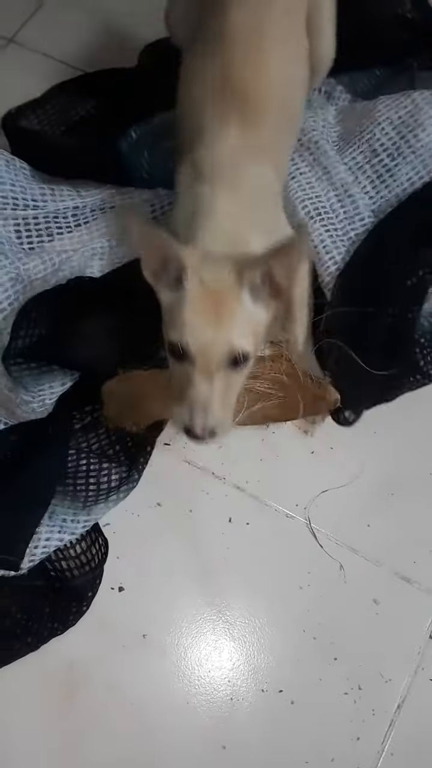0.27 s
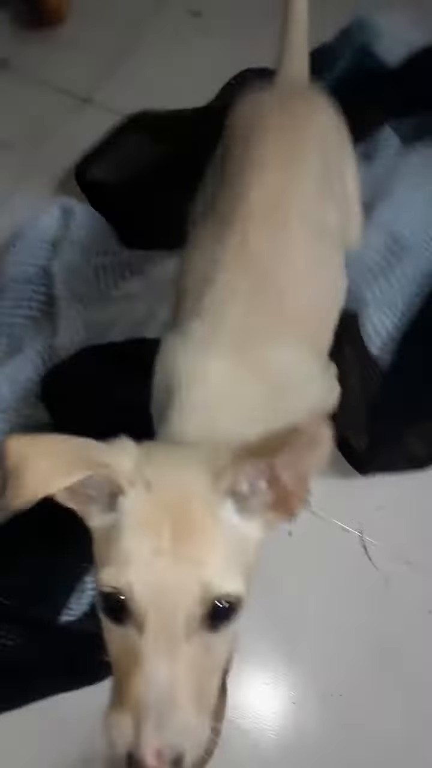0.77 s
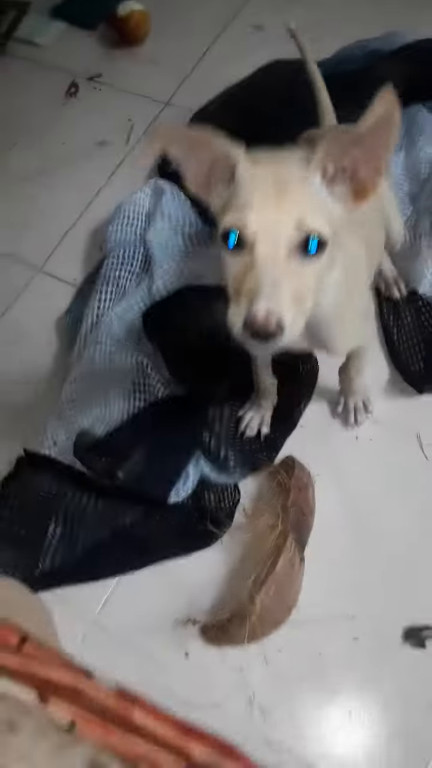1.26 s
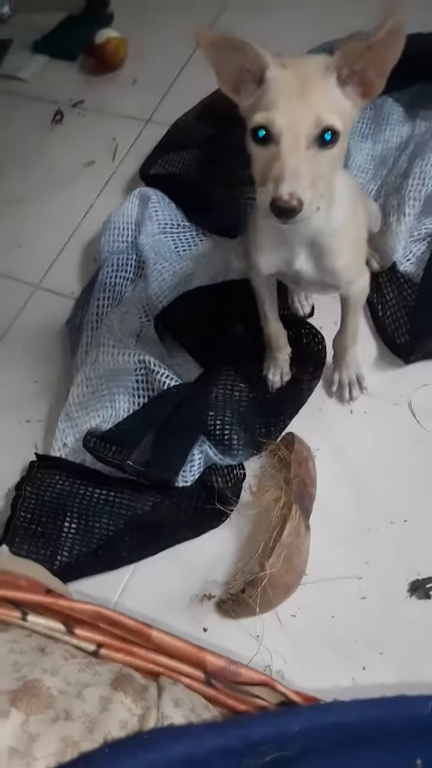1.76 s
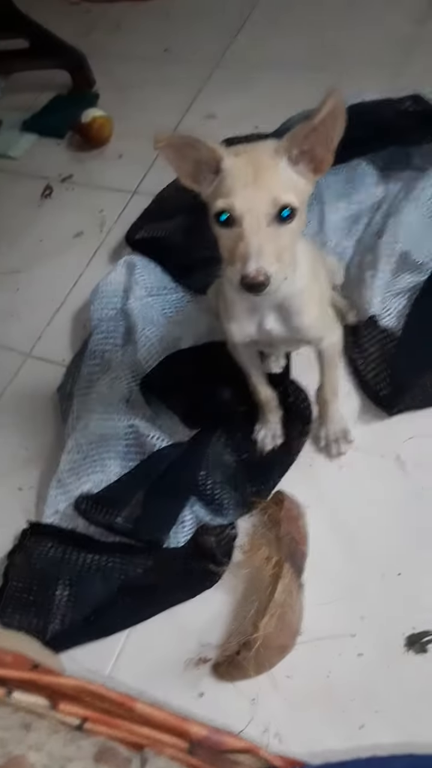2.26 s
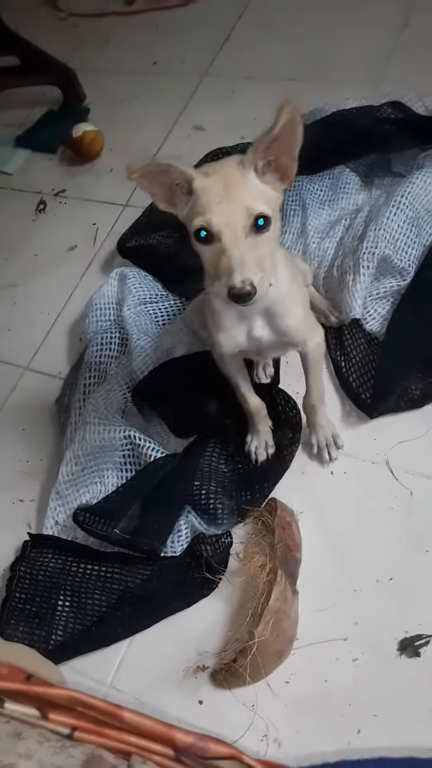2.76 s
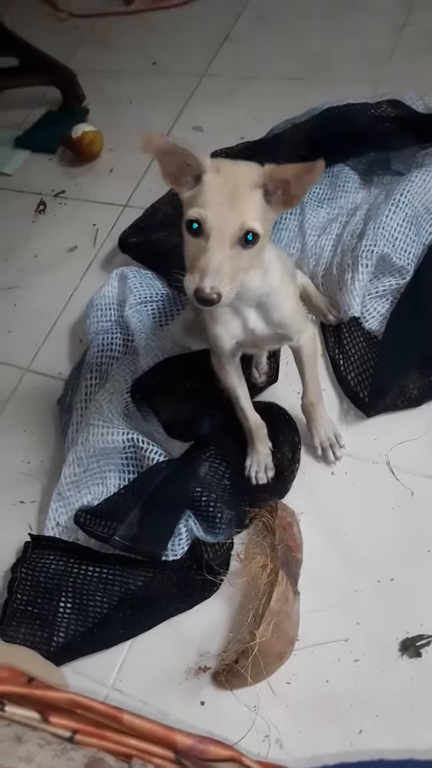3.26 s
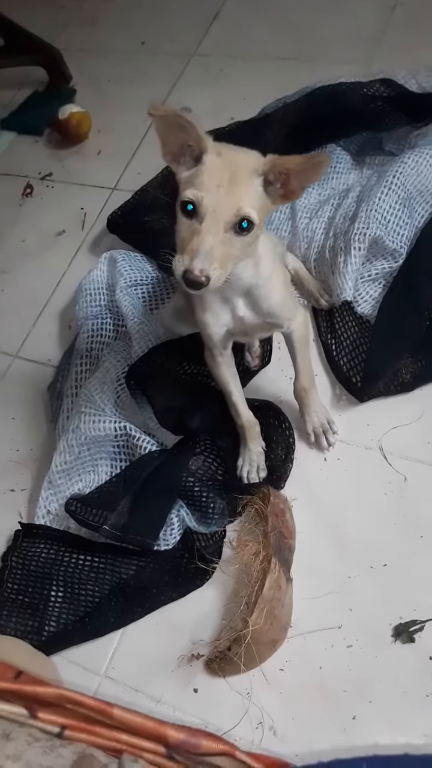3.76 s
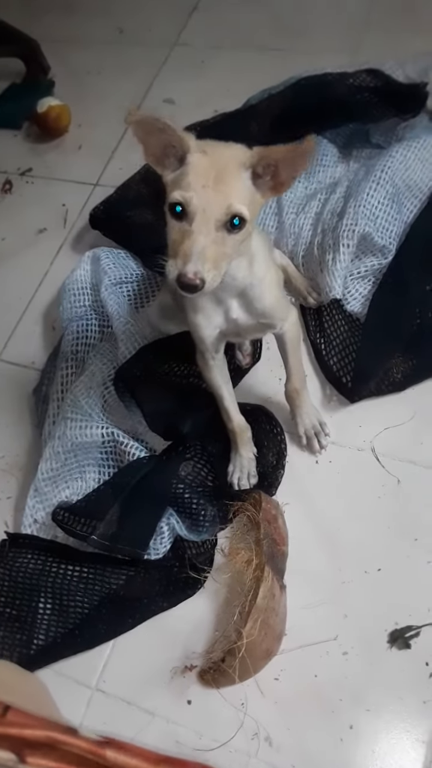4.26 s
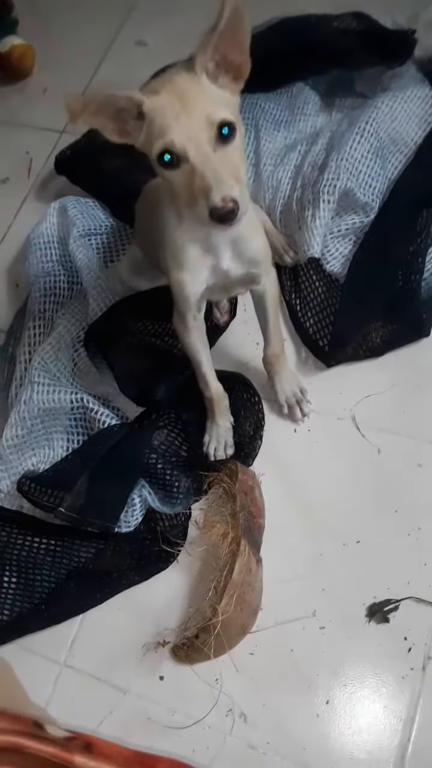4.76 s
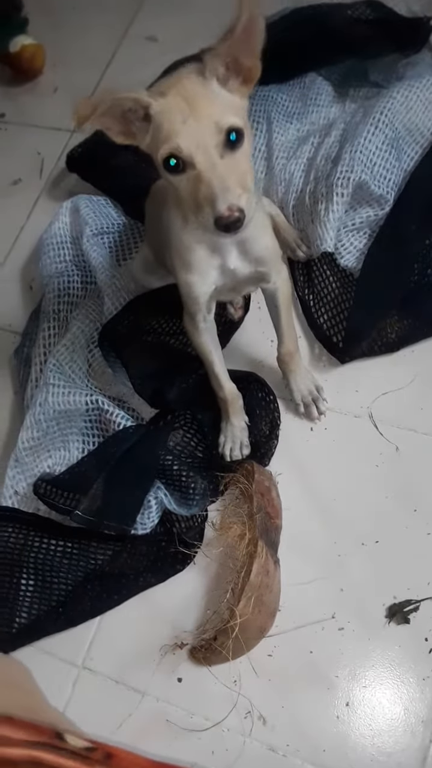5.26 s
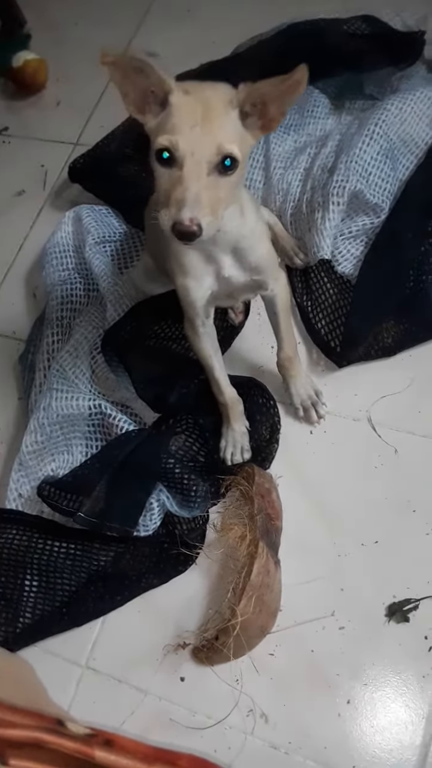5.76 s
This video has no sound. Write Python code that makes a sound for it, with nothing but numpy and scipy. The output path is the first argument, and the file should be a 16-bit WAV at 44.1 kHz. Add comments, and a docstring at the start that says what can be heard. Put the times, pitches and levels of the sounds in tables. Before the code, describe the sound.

A dry husk knocks on tiles and netting rustles as a puppy squeaks rapidly, its high voice then stretching into four piercing whines.

```python
"""Traffic hums outside throughout, with the end of a far horn blast at first and a second blast from 2.4 s.
In the first second a puppy drops a dry husk on tiles, its claws knock and netting rustles under its paws.
From 0.1 s it begs in short creaky squeaks: its vocal folds snap shut in sharp pulses that ring in a small muzzle.
Between squeaks it draws air, heard as coloured noise and a thin nose whistle.
At 2.9 s its voice breaks into four long, loud whines, made by the same folds in a more open muzzle."""
import sys
import numpy as np
from scipy import signal
from scipy.fft import rfft, irfft
from scipy.io import wavfile
from scipy.ndimage import uniform_filter1d

SR = 44100
rng = np.random.default_rng(int(sys.argv[2]) if len(sys.argv) > 2 else 0)


def master_out(mix):
    """Clip the mix to full scale and print it as 16-bit PCM to the path in sys.argv[1]."""
    frames = np.transpose(np.atleast_2d(mix))
    ceiling = np.clip(frames, -1, 1)
    pcm = np.round(ceiling * 32767).astype(np.int16)
    wavfile.write(sys.argv[1], SR, pcm)


N = 265041

# Levels in the tables are relative: the functions below add their own trims in dB. traffic over time: time_s,
# engines_db, tyre_drone_db
TRAFFIC = [(0.0, -53.5, -59.5), (0.28, -53.5, -60.5), (0.52, -51, -58.5), (0.75, -53, -52.5),
           (0.97, -54.5, -59.5), (1.24, -52, -66), (1.57, -56.5, -63), (1.89, -57, -51), (2.02, -60, -55),
           (2.43, -62, -68.5), (2.58, -64, -71.5), (2.89, -64, -64.5), (3.28, -65, -76), (3.65, -64, -66),
           (3.87, -64, -75), (4.37, -66.5, -72.5), (4.84, -64.5, -64.5), (5.04, -64.5, -71.5),
           (5.29, -64.5, -66), (5.46, -67.5, -68.5), (5.71, -61, -72), (6.01, -65, -65.5)]
# colour of the engines: frequency_hz, density_db (per Hz)
ENGINE_COLOUR = [(65, -17), (110, 3.5), (124, 3.5), (188, -3.5), (226, 2.5), (297, -5), (320, -2),
                 (420, -32), (700, -120)]
# colour of the steady deep rumble: frequency_hz, density_db (per Hz)
RUMBLE_COLOUR = [(15, -43.5), (25, -39.5), (32, -24), (34, -24), (40, -19.5), (54, -0.5), (81, 4),
                 (130, -21.5), (170, -31.5), (290, -120)]
# colour of the still air: frequency_hz, density_db (per Hz)
AIR_COLOUR = [(240, -36.5), (400, -12.5), (598, -53), (765, -18), (1580, -15.5), (1930, -21.5),
              (3120, -25.5), (3530, -8), (3870, -32), (7060, -21), (8630, -55.5), (16000, -29)]
RUMBLE_DB, AIR_DB = -61, -63
# one engine draws away: time_s, hum_hz (before a small random wobble), level_db
ENGINE_HUM = [(0, 165.2, -50.5), (.2, 142, -52.5), (.55, 139, -55.5), (.8, 123.7, -58.5), (1.3, 115.7, -65),
              (2.0, 119.5, -67.5), (3.0, 112.1, -70), (6.01, 118.4, -69)]
# far horn: start_s, end_s, note_db, overtones_db
HORN_BLASTS = [(-.1, .17, -54, -85), (2.42, 3.95, -69, -58)]
HORN_HZ, HORN_FADE_S = 638, 0.17

# netting under the paws, as the puppy steps forward and sits down: time_s, level_db
NETTING_LEVEL = [(0, -50.5), (.1, -54), (.45, -62), (.62, -38.5), (.65, -48.5), (.7, -39.5), (.97, -56),
                 (4.0, -77), (6.01, -75.5)]
# colour of the netting, also used for the hiss of breath: frequency_hz, density_db (per Hz)
RUSTLE_COLOUR = [(650, -43), (1100, -12.5), (1490, -14.5), (2130, -18), (4170, -12), (5400, -10.5),
                 (6390, -8.5), (8260, -27.5), (14300, -10.5), (16000, -16)]
# husk and claws touching the tiles: touch_s, knock_db, snap_db
KNOCKS = [(0.18, -38, -22), (0.183, -35, -15), (0.407, -54, -32), (0.488, -32, -39), (0.591, -24.5, -17),
          (0.61, -47.5, -23), (0.655, -47, -26), (0.684, -43, -22), (0.696, -12, -17), (0.751, -28.5, -27)]
# colour of the dull knock: frequency_hz, density_db (per Hz)
HUSK_COLOUR = [(88, -69.5), (150, -22), (1090, -6.5), (1300, -7), (1570, -5), (2600, -6), (2970, -15.5),
               (3600, -9), (4540, -14), (5200, -11.5), (8100, -29.5), (15000, -19)]
ROOM_T60_S = 0.32   # time for the reflections to fall by 60 dB

# breaths drawn between calls: start_s, length_s, muzzle_db, hiss_db, whistle_hz (before a small wobble), whistle_db
PANTS = [ (0.285, 0.22, -58.5, -54.5, 3450, -59), (0.942, 0.19, -46.5, -61, 3482, -66),
         (1.189, .19, -86, -47.5, 3496, -76), (1.531, 0.3, -57.5, -57, 3703, -64),
         (1.827, 0.19, -49.5, -65, 3600, -56.5), (2.164, 0.16, -95, -61, 3730, -58),
         (2.578, 0.28, -66, -65, 3660, -57.5), (3.66, 0.2, -89, -76, 3563, -57),
         (5.389, .4, -100, -76, 3535, -70.5), ]
PANT_FADE_S = 0.0083

# resonances of the nose: frequency_hz, width_hz, gain_db
NOSE = [(11110, 320, 12.5), (10860, 120, 6.5), (11700, 110, 15), (15200, 870, -8.5), (14500, 4800, 14.5)]
# resonance of the mouth: frequency_hz, width_hz, gain_db
MOUTH = [(2648, 250, 0)]
# resonances of the muzzle in whines: frequency_hz, width_hz, gain_db
MUZZLE_OPEN = [(1432, 930, -11.5), (4003, 635, -1.5), (4520, 1020, -3.5), (6060, 1020, 1), (6910, 263, 7),
               (7080, 660, -1.5)]
# resonances of the muzzle in squeaks: frequency_hz, width_hz, gain_db
MUZZLE_SHUT = [(1582, 690, 2.5), (3760, 700, 3.5), (4770, 680, 2.5), (5600, 590, 3.5), (6340, 277, 10),
               (7100, 540, 4)]

# short squeaks, most of them an arch of pitch, one almost level with a slight dip:
# start_s, rise_s, fall_s, first_hz, crest_hz (the turning point), last_hz, level_db,
# fundamental_db and treble_db (relative to the level), period_doubling (0-1), flutter (share of the pitch)
SQUEAKS = [ (0.112, 0.074, 0.075, 1410, 1925, 1149, -36, -9, 0, .4, .026),
           (0.237, 0.015, 0.055, 1581, 1660, 1200, -35, -3, 0.5, .3, 0.022),
           (0.43, 0.091, 0.093, 1400, 1830, 1400, -39, -6.5, 0, 0.4, 0.0035),
           (0.757, 0.06, 0.14, 1320, 1712, 1120, -40, 3, -0.5, 0.55, 0.0055),
           (1.055, 0.089, 0.063, 1189, 1679, 1080, -35.5, -3.5, -1, .38, 0.0099),
           (1.359, 0.077, 0.11, 1404, 1945, 1270, -38.5, -8.5, 0.5, 0.14, .007),
           (1.678, 0.07, 0.087, 1480, 1586, 1220, -36.5, -6.5, -1.5, 0.92, 0.0053),
           (1.982, 0.069, 0.12, 1360, 1852, 1320, -39.5, -7, 0.5, .15, 0.0066),
           (2.32, 0.04, 0.2, 1912, 1925, 1390, -38, -6.5, 2.5, 0.18, 0.0242),
           (2.498, 0.056, 0.05, 1494, 1710, 1530, -41.5, -9, 0, 0.55, 0.017),
           (2.782, 0.028, 0.055, 1632, 1600, 1700, -38, -10, -7, .2, .01),
           (2.815, 0.073, 0.052, 1663, 2143, 1255, -32.5, -8.5, 1.5, 0, 0.022), ]
SQUEAK_ATTACK_S, SQUEAK_RELEASE_S = 0.04, 0.041
ARCH_BEND = 1.1   # 1 = pointed turning point, 2 = round
# a squeak starts and ends as a creak, its pure tone this much weaker
LOCK_S, UNLOCK_S, CREAK_DROP_DB = 0.045, 0.016, 16
SQUEAK_QUAVER_DB, QUAVER_HZ = 1.0, 30   # the push behind a squeak is unsteady

# the four long whines, one table each: time_s, pitch_hz, effort_db, treble_db (relative to the effort)
FIRST_WHINE = [(2.92, 1410, -34, 9), (2.928, 1314, -33, 4.5), (2.956, 1358, -33.5, 8),
               (2.994, 1218, -26, -1.5), (3.01, 1303, -31.5, 2.5), (3.136, 1345, -31.5, 1),
               (3.17, 1283, -29.5, 2), (3.216, 1074, -25, 0.5), (3.294, 1089, -26, -2),
               (3.392, 955, -28.5, 0), (3.458, 985, -27.5, -2), (3.472, 907.3, -30, -0.5),
               (3.534, 885, -29.5, -2.5), (3.588, 699, -36, -0.5), (3.62, 730, -40, -3),
               (3.658, 897, -43.5, 3), (3.698, 736, -59, -1), (3.72, 697.6, -56.5, -14)]
SECOND_WHINE = [(4.025, 568, -69.5, -5), (4.061, 596, -44, -3.5), (4.109, 625, -39, 10),
                (4.131, 595, -35, 5.5), (4.161, 588, -30.5, 0), (4.193, 774.2, -31.5, 0.5),
                (4.257, 792, -30, -0.5), (4.371, 972.0, -30, 1.5), (4.399, 920, -32.5, 5),
                (4.549, 1023, -28, 1), (4.607, 906.8, -25, 2), (4.669, 523.5, -50.5, 11.5),
                (4.72, 492, -60, 4)]
THIRD_WHINE = [(4.73, 483, -55, 1), (4.77, 556, -53, 9.5), (4.8, 478.4, -46.5, 9), (4.824, 569, -37.5, 6),
               (4.878, 506.5, -35, 6), (4.89, 683, -31, 3.5), (4.922, 691, -28.5, 2.5),
               (4.948, 649, -30, 2), (4.986, 725, -27, 0), (5.024, 712.9, -29.5, 4), (5.056, 839, -28, -2),
               (5.1, 827, -30, 5), (5.146, 969, -26.5, -0.5), (5.248, 804.5, -28, 4), (5.278, 676, -27, 2),
               (5.302, 506, -31.5, 6), (5.348, 387.6, -33.5, 5), (5.4, 382, -63.5, 4)]
LAST_WHINE = [(5.795, 660.0, -63, 6), (5.803, 662.5, -37.5, 6), (5.847, 1088, -24, -7),
              (5.871, 1220, -27.5, -1), (5.915, 1118, -25.5, -4.5), (5.963, 1105, -24.5, 0),
              (5.973, 1171, -27, 3), (6.01, 1099, -26.5, 3)]
# how each whine is held: start_roughness (0-1), end_roughness (0-1), start_mouth_db, end_mouth_db, fundamental_db
WHINE_MANNER = [(.06, 0.8, -1.5, 4.5, 0), (0.81, 0.52, -6, -6, 2), (0.12, 0.5, 1.5, -11, 0.5),
                (.15, 0.3, -1, 2, -1.5)]
# the voice breaks from squeak to whine: start_s, end_s, added_flutter (share of the pitch), added_doubling (0-1)
VOICE_BREAK = (2.91, 3.005, .033, .18)
FULL_VOICE_DB, ROUGHER_PER_DB = -34, 0.022   # below this effort the folds grow unsteady
# flutter as a share of the pitch, up to doubled by roughness; period doubling (0-1)
WHINE_FLUTTER, WHINE_DOUBLING = 0.0041, 0.0083
# high notes have more fundamental and ring more in the mouth
PURE_HZ, PURER_DB_PER_OCTAVE, MOUTH_DB_PER_OCTAVE = 1308, 23.5, 19


def from_db(db):
    """Turn decibels into a plain gain."""
    return 10 ** (np.asarray(db) / 20)


def rms_one(x):
    """Scale a sound to an average level of 1."""
    return x / np.sqrt(np.mean(x ** 2) + 1e-20)


def in_time(rows):
    """Draw straight lines between the rows of a table: one curve per column, sample by sample."""
    rows = np.array(rows)
    times, *columns = rows[np.argsort(rows[:, 0], kind="stable")].T
    return [np.interp(np.arange(N) / SR, times, column) for column in columns]


def held(rows):
    """Hold each column of an event table from the start of one event to the next."""
    rows = np.array(rows)
    event = np.searchsorted(np.sort(rows[:, 0]), np.arange(N) / SR) - 1
    return rows[np.maximum(event, 0)].T


def swell(start, end, attack_s, release_s):
    """Attack, hold and release, from 0 to 1 and back."""
    t = np.arange(N) / SR
    return np.clip(np.minimum((t - start) / attack_s, (end - t) / release_s), 0, 1)


def drift(rate_hz):
    """Smoothly wandering chance with spread 1; a higher rate wanders faster."""
    r = np.exp(-2 * np.pi * rate_hz / SR)
    wander = signal.lfilter([1], [1, -2 * r, r * r], rng.standard_normal(N + SR))
    return rms_one(wander[SR:])


def cut(x, hz, kind, order=2):
    """Remove the highs, the lows or both with a smooth filter."""
    return signal.sosfilt(signal.butter(order, hz, kind, fs=SR, output="sos"), x)


def resonate(x, modes):
    """Ring several resonances side by side, with alternating signs."""
    out = 0
    for k, (hz, width, db) in enumerate(modes):
        r = np.exp(-np.pi * width / SR)
        gain = (-1) ** k * from_db(db) * (1 - r * r) / 2
        feedback = [1, -2 * r * np.cos(2 * np.pi * hz / SR), r * r]
        out = out + signal.lfilter([gain, 0, -gain], feedback, x + 1e-18)
    return out


def colour(x, spectrum, size=8192):
    """Filter with the given spectrum and unit energy, its response as early as possible (minimum phase)."""
    hz, db = np.transpose(spectrum)
    octaves = np.log2(np.maximum(np.arange(size // 2 + 1) * SR / size, 1))
    beyond = np.abs(octaves - np.clip(octaves, np.log2(hz[0]), np.log2(hz[-1])))
    # outside the table the spectrum falls by 20 dB per octave
    full_db = np.interp(octaves, np.log2(hz), db) - 20 * beyond
    cepstrum = irfft(np.log(from_db(full_db)))
    kernel = irfft(np.exp(rfft(2 * cepstrum[:size // 2], size)))
    return signal.fftconvolve(x, kernel / np.linalg.norm(kernel))[:N]


def noise(spectrum):
    """Steady noise with the given colour."""
    return rms_one(colour(rng.standard_normal(N), spectrum))


def noise_band(hz, width_hz):
    """Noise sent twice through one resonance."""
    mode = [(hz, width_hz, 0)]
    return rms_one(resonate(resonate(rng.standard_normal(N), mode), mode))


def even(x, size=700):
    """Hold the running level at 1."""
    power = uniform_filter1d(uniform_filter1d(x * x, size), size)
    return x / np.sqrt(np.abs(power) + 1e-12)


def horn():
    """Far blasts of one note and two overtones, blurred by the street into narrow noise bands."""
    gate = sum(swell(start, end, HORN_FADE_S, HORN_FADE_S) for start, end, *_ in HORN_BLASTS)
    _, _, note_db, overtones_db = held(HORN_BLASTS)
    note = noise_band(HORN_HZ, 81)
    overtones = noise_band(2 * HORN_HZ, 76) + from_db(-4.5) * noise_band(3 * HORN_HZ, 83)
    return gate * (from_db(note_db) * note + from_db(overtones_db) * overtones)


def surroundings(drone_hz=360, drone_width_hz=220, air_db=-5.0, rumble_db=-1.0):
    """Noise for traffic, tyre drone, rumble and still air; a wavering sine for one engine; the far horn."""
    engines_db, drone_db = in_time(TRAFFIC)
    engines = from_db(engines_db) * noise(ENGINE_COLOUR)
    drone = from_db(drone_db) * noise_band(drone_hz, drone_width_hz)
    hum_hz, hum_db = in_time(ENGINE_HUM)
    hum_phase = 2 * np.pi * np.cumsum(hum_hz * (1 + 0.02 * drift(11))) / SR
    hum = from_db(hum_db + 2 * drift(22)) * np.sqrt(2) * np.sin(hum_phase)
    rumble = from_db(RUMBLE_DB + rumble_db) * noise(RUMBLE_COLOUR)
    air = from_db(AIR_DB + air_db) * noise(AIR_COLOUR)
    return engines + drone + hum + horn() + rumble + air


def netting(grain_db=2.0):
    """The mesh rustles under the paws as grainy noise and settles as the puppy sits."""
    level_db, = in_time(NETTING_LEVEL)
    return from_db(level_db) * rms_one(noise(RUSTLE_COLOUR) * from_db(grain_db * drift(150)))


def knocks(body_db=20.0, snap_db=16.5, scrape_db=-18.0, scrape_s=0.019):
    """Each contact is a dull knock and a bright snap, followed by a short scrape of fibres."""
    touch_s, knock_db, bright_db = np.transpose(KNOCKS)
    knock, snap = np.zeros((2, N))
    at = ((touch_s + 0.0025) * SR).astype(int)   # the force peaks just after first touch
    knock[at] = from_db(knock_db + body_db)
    snap[at] = from_db(bright_db + snap_db)
    t = np.arange(SR // 4) / SR
    crackle = rng.random(len(t)) < 1800 / SR   # about 1800 tiny snaps a second
    fibres = rms_one(rng.standard_normal(len(t)) * crackle)
    contact = from_db(scrape_db - 13.5) * fibres * np.exp(-t / scrape_s)
    contact[0] = 1   # the hit itself
    hits = cut(colour(knock, HUSK_COLOUR), 14000, "low") + cut(snap, [3300, 7500], "band")
    return signal.fftconvolve(hits, contact)[:N]


def pants(hz=1520, width_hz=400, octave_db=-10.5):
    """Air drawn in through the lowest resonance of the muzzle, with a hiss and a thin whistle in the nose."""
    gate = sum(swell(start, start + length, PANT_FADE_S, PANT_FADE_S) for start, length, *_ in PANTS)
    _, _, muzzle_db, hiss_db, whistle_hz, whistle_db = held(PANTS)
    phase = 2 * np.pi * np.cumsum(whistle_hz * (1 + 0.006 * drift(8))) / SR
    whistle = (0.7 + 0.5 * drift(45)) * np.sin(phase)
    whistle = whistle + from_db(octave_db) * drift(200) * np.sin(2 * phase)
    breath = from_db(muzzle_db) * noise_band(hz, width_hz)
    hiss = from_db(hiss_db) * noise(RUSTLE_COLOUR)
    return gate * (breath + hiss + from_db(whistle_db) * whistle)


def closures(pitch, jitter_s, shimmer_db, doubling=0., size=8):
    """Vocal folds snap shut once a cycle, a little early or late, weak or strong; doubling weakens every other."""
    each = np.ones(N)
    turns = np.cumsum(pitch) / SR
    at = np.flatnonzero(np.diff(np.floor(turns)))
    chance = rng.standard_normal((N // 10, 2))[:len(at)]
    on_time = at + (np.ceil(turns[at]) - turns[at]) * SR / pitch[at]
    exact = on_time + (jitter_s * each)[at] * SR * chance[:, 0]
    strength = from_db((shimmer_db * each)[at] * chance[:, 1])
    strength = strength * (1 + (doubling * each)[at] * (-1) ** np.arange(len(at)))
    # a short windowed sinc places each pulse between samples
    taps = np.floor(exact).astype(int)[:, None] + np.arange(1 - size, size + 1)
    offset = taps - exact[:, None]
    pulses = strength[:, None] * np.sinc(offset) * np.cos(np.pi * offset / (2 * size)) ** 2
    return np.bincount(np.clip(taps, 0, N - 1).ravel(), pulses.ravel(), N)


def throat(pulses, pitch, muzzle_modes, tone_db, mouth_db, treble_db, top_hz=7900):
    """A pure tone plus pulses ringing in mouth, muzzle and nose; the mouth flares when a harmonic crosses it."""
    tone = np.sqrt(2) * np.cos(2 * np.pi * np.cumsum(pitch) / SR)
    mouth = cut(resonate(pulses, MOUTH), [2200, 3300], "band")
    muzzle = cut(resonate(pulses, muzzle_modes), 846, "high", order=4)
    muzzle = cut(muzzle, top_hz, "low", order=5)
    # the bare snap comes through the nose too
    nose = cut(resonate(pulses, NOSE) + 0.8 * pulses, 10200, "high", order=4)
    rings = from_db(mouth_db) * rms_one(mouth) + even(muzzle) + from_db(treble_db) * even(nose)
    return from_db(tone_db) * tone + rings


def squeaks(tone_db=-3.0, mouth_db=-37.0, treble_gain_db=-0.4, creak_hz=390):
    """A high whistle over a slow, uneven creak; the stronger the whistle, the more regular the closures."""
    t = np.arange(N) / SR
    start, rise_s, fall_s, first_hz, crest_hz, last_hz, _, pure_db, treble_db, doubling, flutter = held(SQUEAKS)
    calls = [(begin, begin + rise + fall, db) for begin, rise, fall, _, _, _, db, *_ in SQUEAKS]
    envelope = np.max([from_db(db) * swell(begin, finish, SQUEAK_ATTACK_S, SQUEAK_RELEASE_S)
                       for begin, finish, db in calls], axis=0)
    locked = np.max([swell(begin, finish, LOCK_S, UNLOCK_S) for begin, finish, _ in calls], axis=0)

    crest = start + rise_s
    from_crest = np.clip(np.maximum((crest - t) / rise_s, (t - crest) / fall_s), 0, 1)
    edge_hz = np.where(t < crest, first_hz, last_hz)
    pitch = crest_hz + (edge_hz - crest_hz) * from_crest ** ARCH_BEND
    pitch = pitch * (1 + flutter * drift(130))

    fundamental_db = pure_db - CREAK_DROP_DB * (1 - locked)
    clear = np.clip(3.8 * from_db(fundamental_db) ** 2, 0, 0.85)   # share of regular closures
    whistle = even(closures(pitch, 7e-6, 0.9, doubling))
    creak = even(closures(creak_hz * np.exp(0.13 * drift(40)), 1.2e-4, 3.8))
    air = rng.standard_normal(N)
    source = np.sqrt(clear) * whistle + np.sqrt(1 - clear) * (0.97 * creak + 0.22 * air)
    locked_db = 10 * np.log10(np.minimum(2 * clear, 1))   # the pure tone fades while the folds only creak
    push = from_db(SQUEAK_QUAVER_DB * drift(QUAVER_HZ))
    voice = throat(source, pitch, MUZZLE_SHUT, fundamental_db + tone_db + locked_db, mouth_db,
                   treble_db + treble_gain_db)
    return envelope * push * voice


def whines(level_db=0.24, tone_db=-7.0, mouth_gain_db=-3.5, treble_gain_db=0.44):
    """Full voice: uneven closures blur the high harmonics first and leave the low ones clean."""
    calls = [FIRST_WHINE, SECOND_WHINE, THIRD_WHINE, LAST_WHINE]
    gate = np.max([swell(call[0][0], call[-1][0] + 0.025, 0.004, 0.012) for call in calls], axis=0)
    pitch, effort_db, treble_db = [uniform_filter1d(curve, size=220) for curve in in_time(np.vstack(calls))]
    manner = []
    for call, (first_rough, last_rough, first_db, last_db, db) in zip(calls, WHINE_MANNER):
        manner.append((call[0][0], first_rough, first_db, db))
        manner.append((call[-1][0], last_rough, last_db, db))
    held_rough, opening_db, pure_db = in_time(manner)
    weakness_db = np.maximum(FULL_VOICE_DB - effort_db, 0)
    rough = np.clip(held_rough + ROUGHER_PER_DB * weakness_db, 0, 1)

    octaves = np.log2(pitch / PURE_HZ)
    fundamental_db = tone_db + pure_db + PURER_DB_PER_OCTAVE * octaves
    mouth_db = mouth_gain_db + opening_db + MOUTH_DB_PER_OCTAVE * octaves

    break_start, break_end, break_flutter, break_doubling = VOICE_BREAK
    breaking = swell(break_start, break_end, 0.01, 0.01)
    flutter = WHINE_FLUTTER * (1 + rough) + break_flutter * breaking
    pitch = pitch * (1 + flutter * drift(130))
    jitter_s = (0.0012 + 0.018 * rough + 0.06 * rough ** 6) / pitch
    shimmer_db = 0.2 + 1.3 * rough + 2 * rough ** 4
    pulses = even(closures(pitch, jitter_s, shimmer_db, WHINE_DOUBLING + break_doubling * breaking))
    air = 0.25 * rough ** 1.5 * cut(rng.standard_normal(N), 3000, "high")
    tremble = from_db(1.1 * rough * drift(60))
    treble_db = treble_db + treble_gain_db + 1.0 * drift(50)   # the treble flickers
    voice = throat(pulses + air, pitch, MUZZLE_OPEN, fundamental_db, mouth_db, treble_db)
    return gate * tremble * from_db(effort_db + level_db) * voice


def room(x, wall_cut_hz=5000):
    """Diffuse reflections from tiles and walls: fading noise, duller than the direct sound."""
    t = np.arange(SR // 2) / SR
    tail = cut(rng.standard_normal(len(t)), wall_cut_hz, "low")
    tail = tail * from_db(-60 * t / ROOM_T60_S) * (t > 0.004)   # the first reflection takes 4 ms
    return signal.fftconvolve(x, tail / np.linalg.norm(tail))[:N]


def scene(voice_room_db=-18.5, knock_room_db=-10.5):
    """Add all sources and the room's reflections, the same in both channels."""
    background = surroundings() + netting()
    husk = knocks()
    voice = pants() + squeaks() + whines()
    wet = room(from_db(voice_room_db) * voice + from_db(knock_room_db) * husk)
    return np.tile(background + husk + voice + wet, (2, 1))


def record(dry):
    """Cut the top steeply above 15850 Hz."""
    return signal.sosfilt(signal.ellip(10, 0.3, 70, 15850, fs=SR, output="sos"), dry)


dry = scene()
out = record(dry)
master_out(out)
```